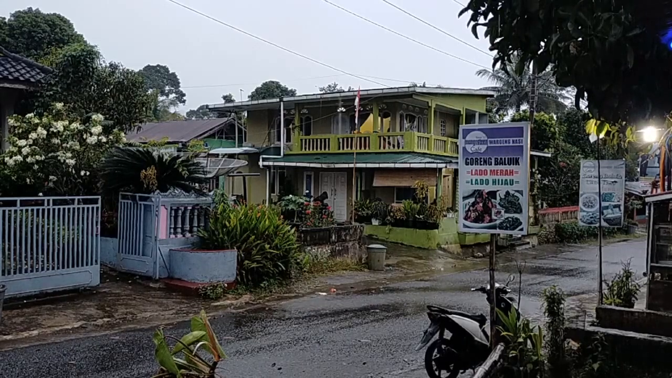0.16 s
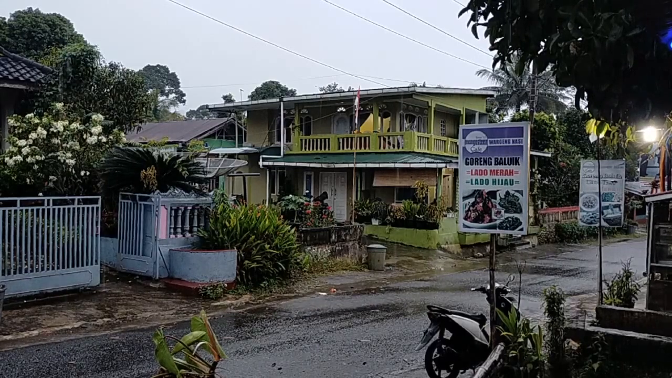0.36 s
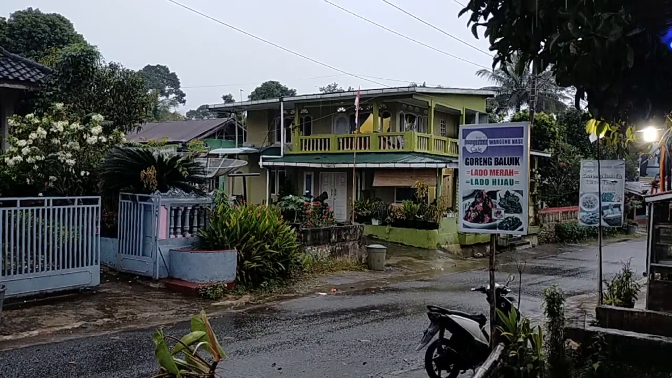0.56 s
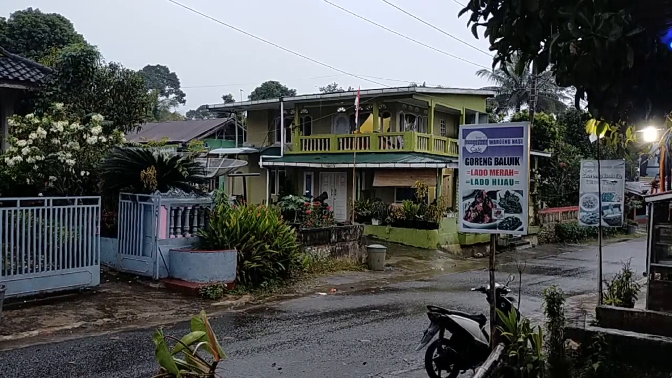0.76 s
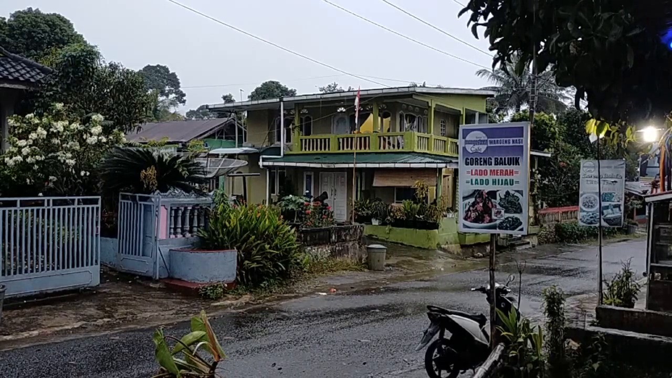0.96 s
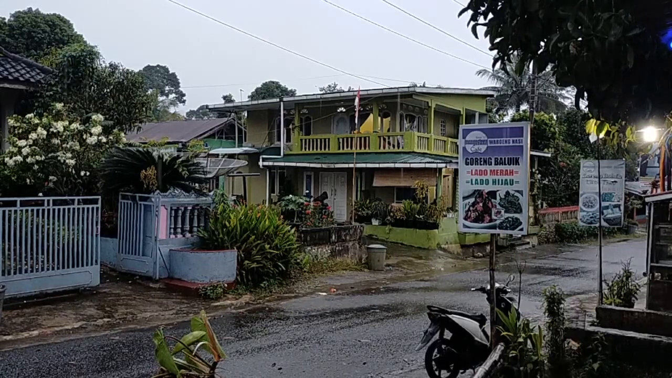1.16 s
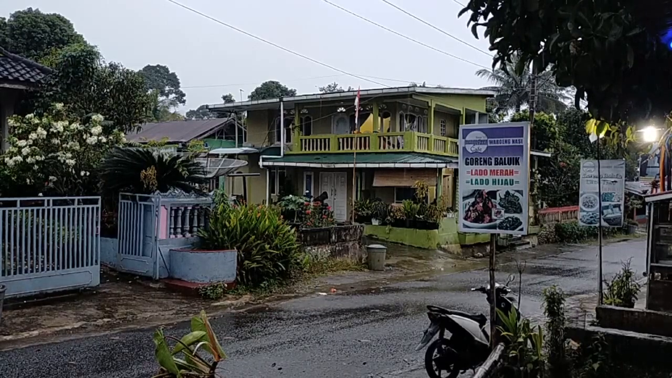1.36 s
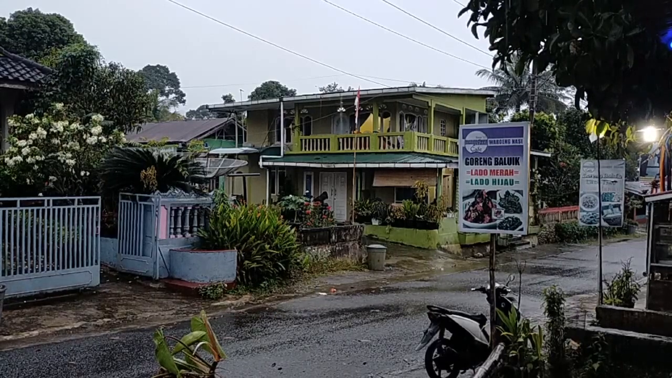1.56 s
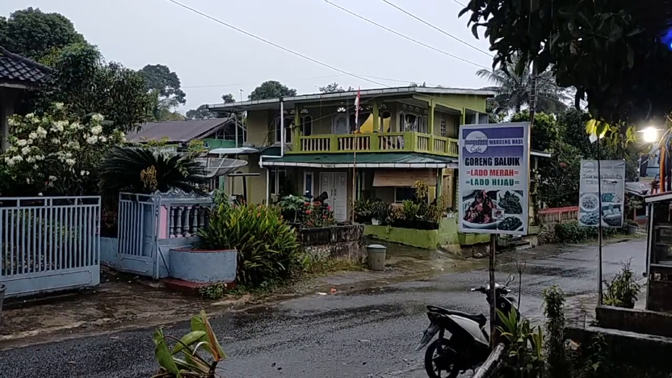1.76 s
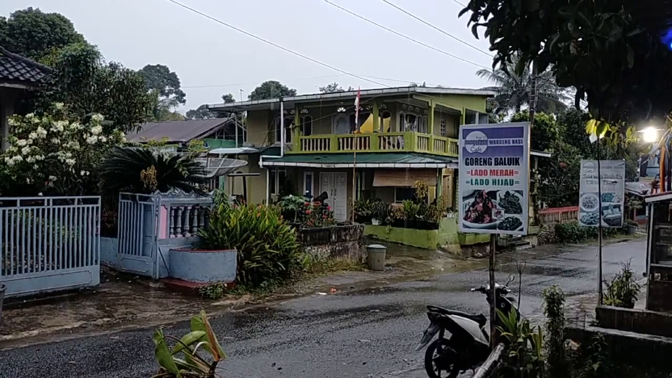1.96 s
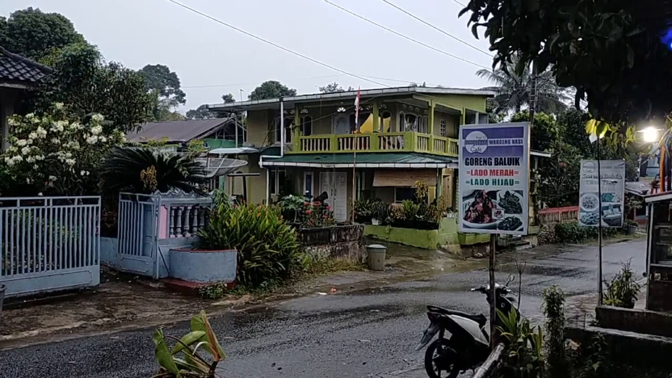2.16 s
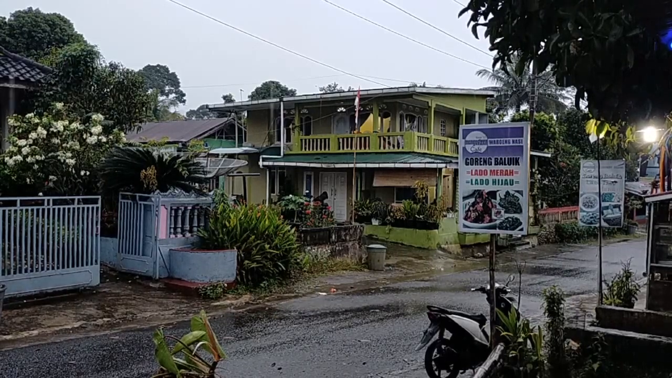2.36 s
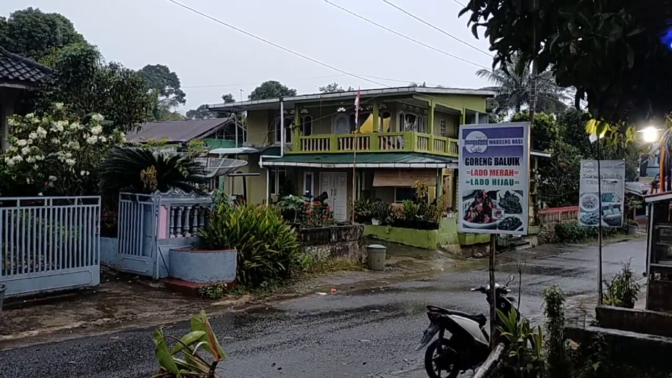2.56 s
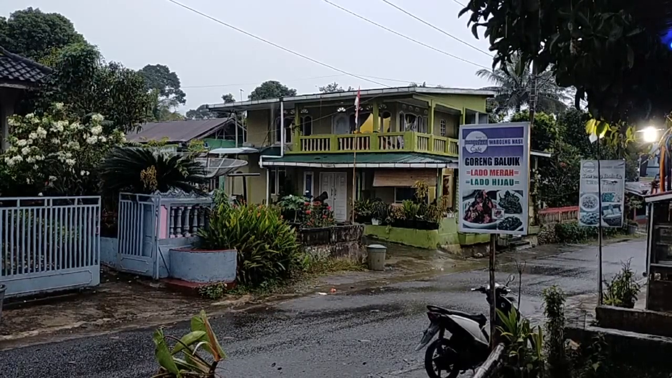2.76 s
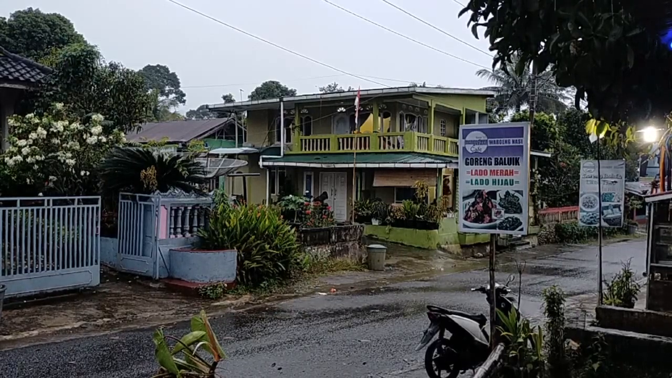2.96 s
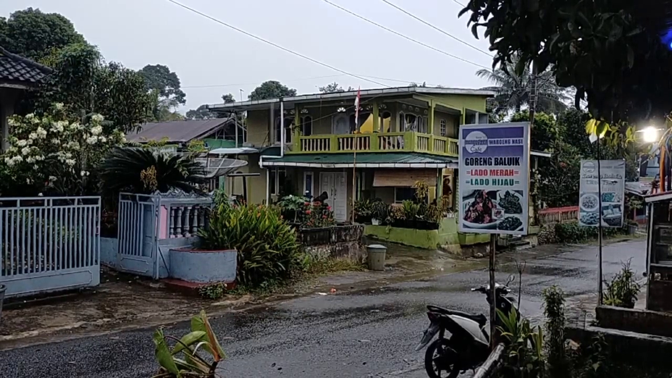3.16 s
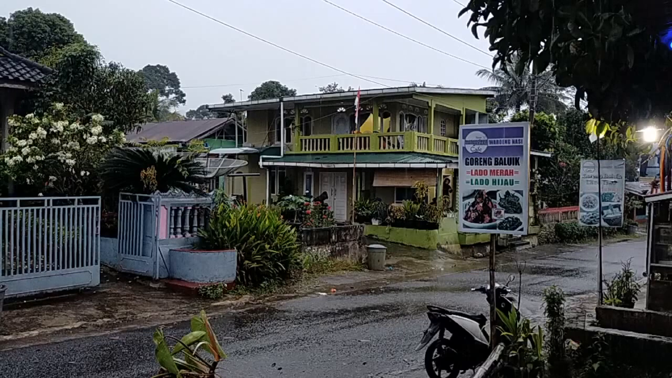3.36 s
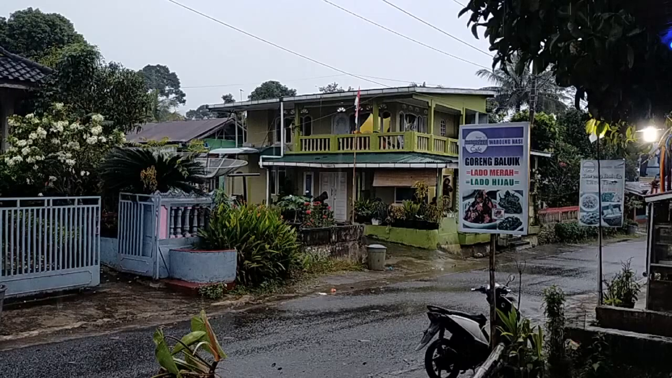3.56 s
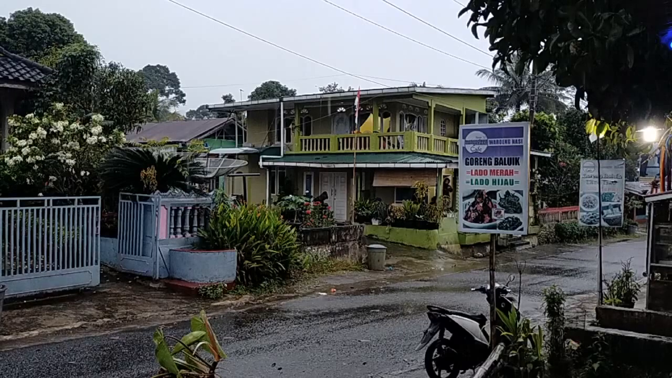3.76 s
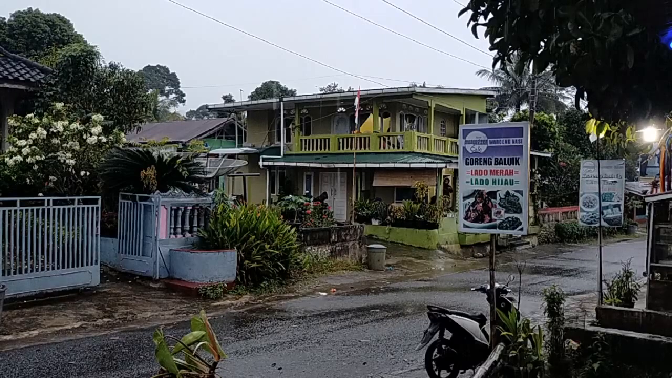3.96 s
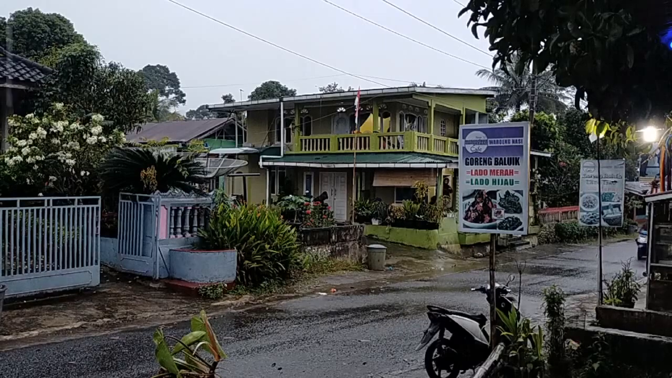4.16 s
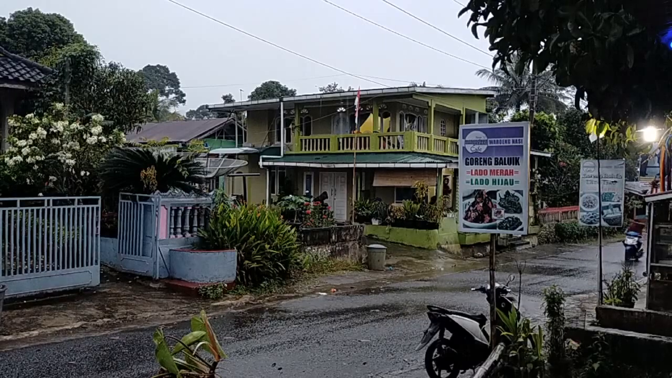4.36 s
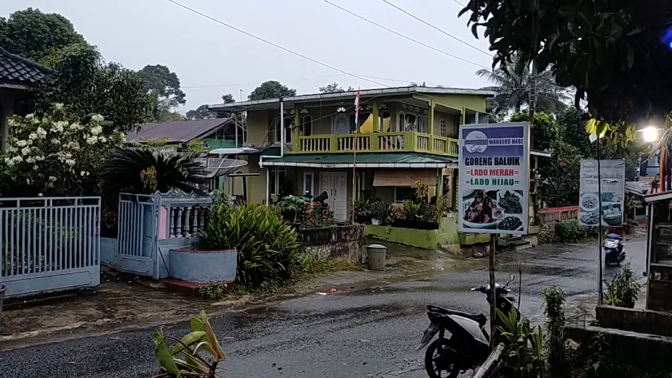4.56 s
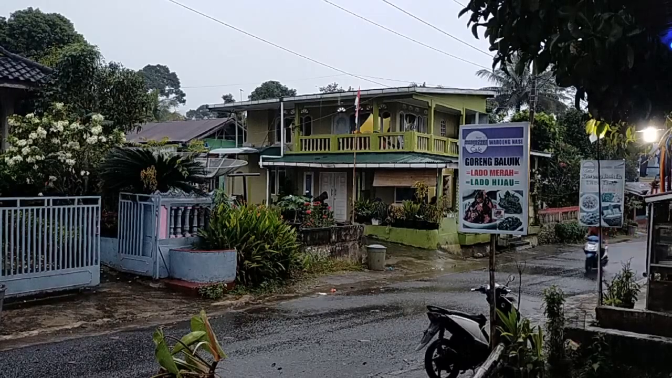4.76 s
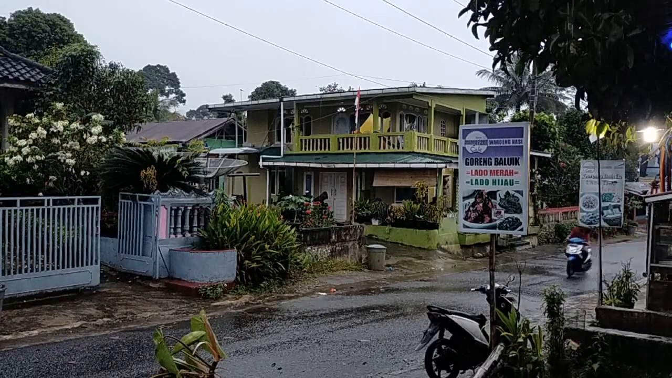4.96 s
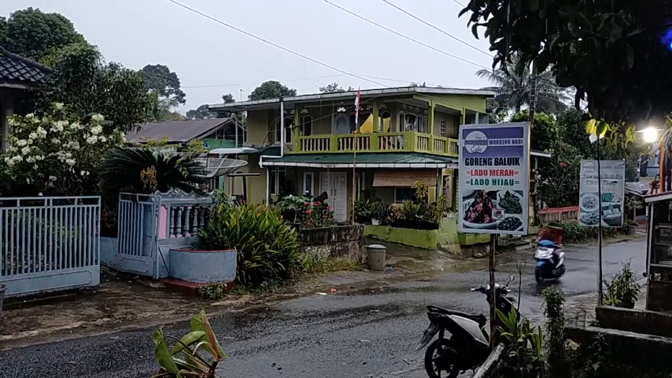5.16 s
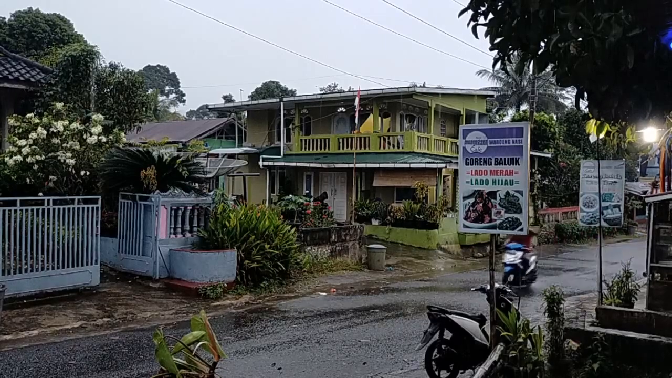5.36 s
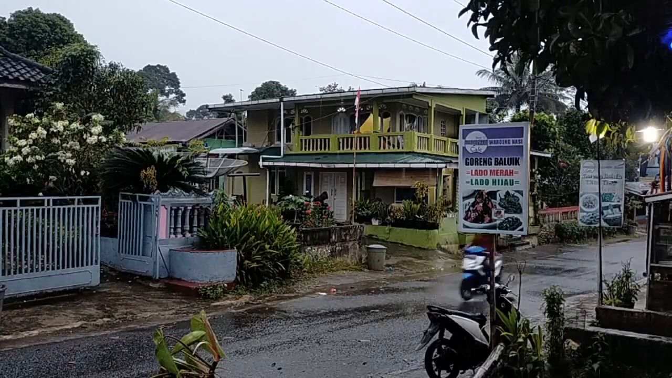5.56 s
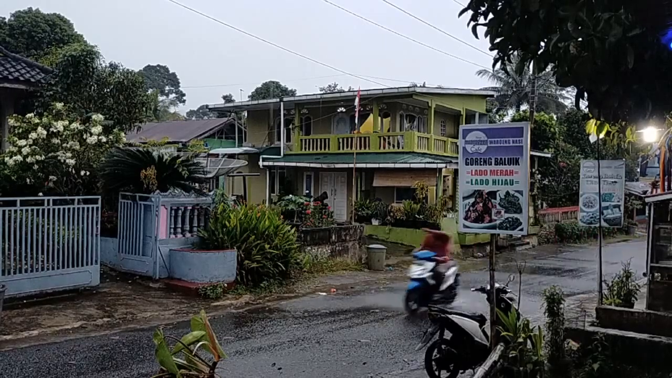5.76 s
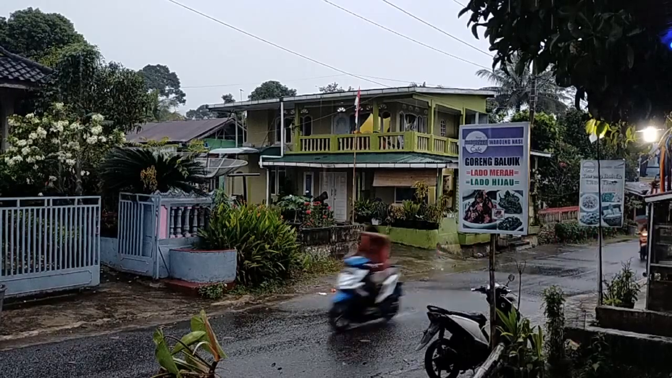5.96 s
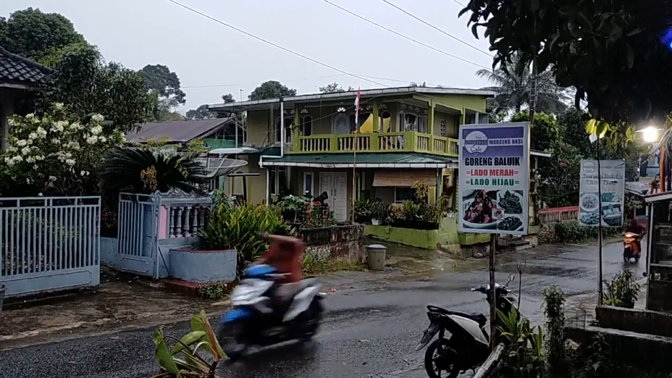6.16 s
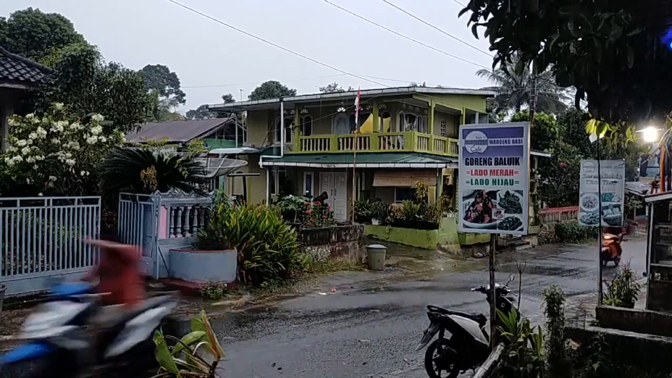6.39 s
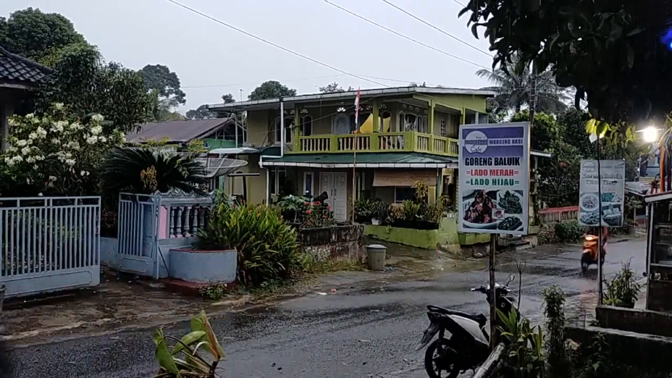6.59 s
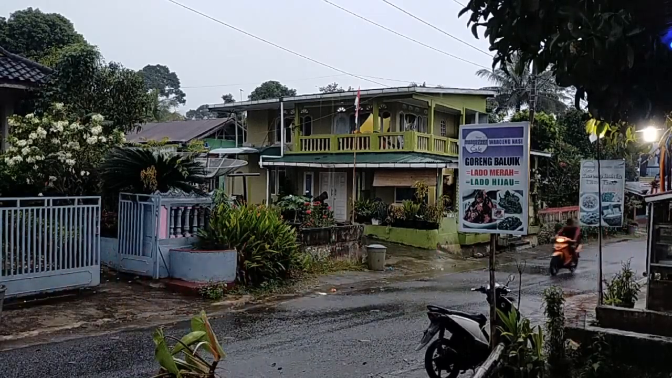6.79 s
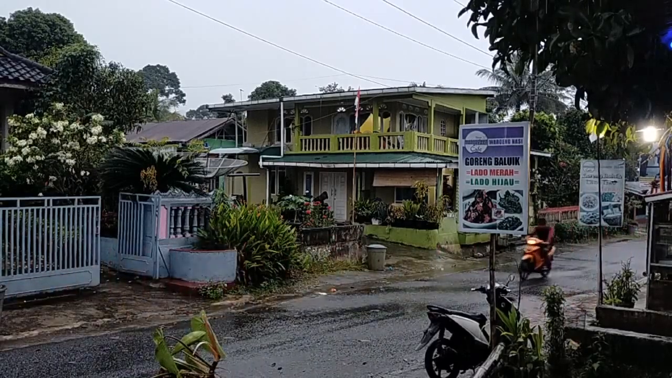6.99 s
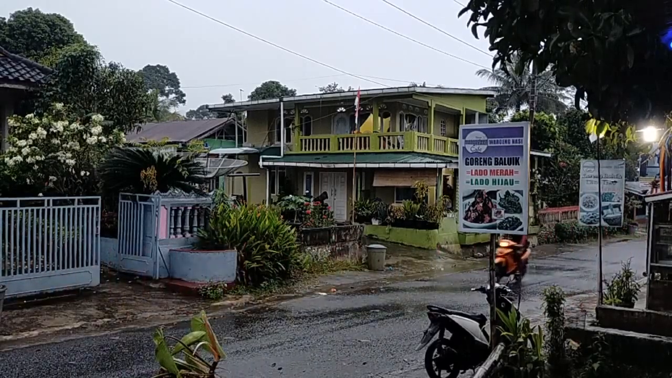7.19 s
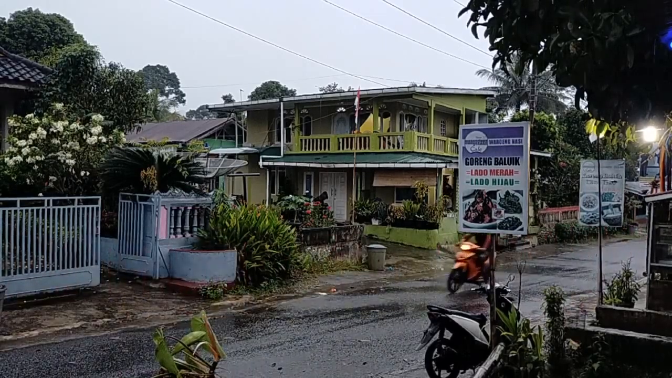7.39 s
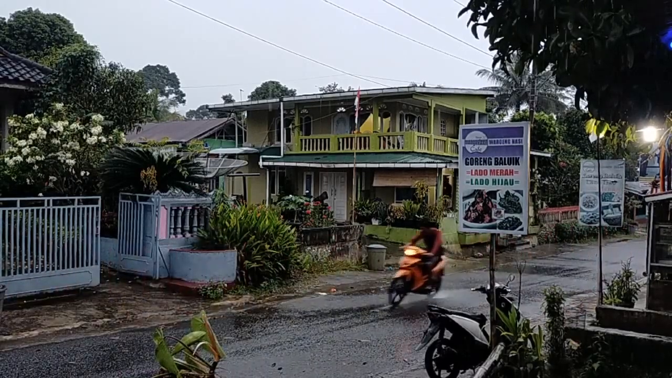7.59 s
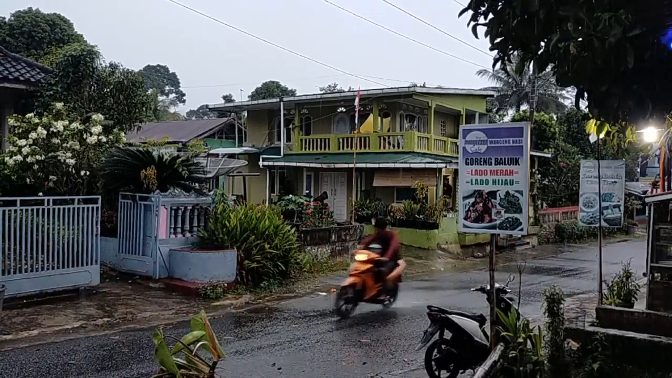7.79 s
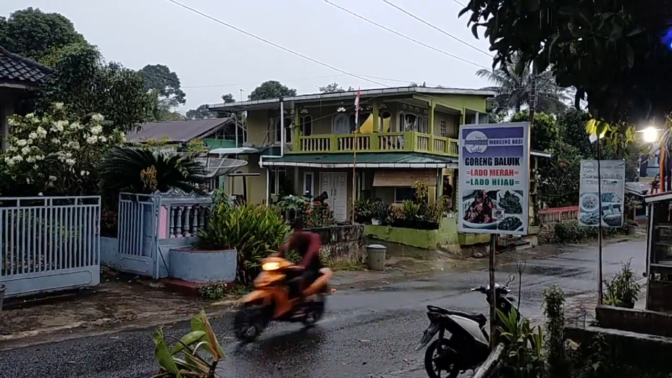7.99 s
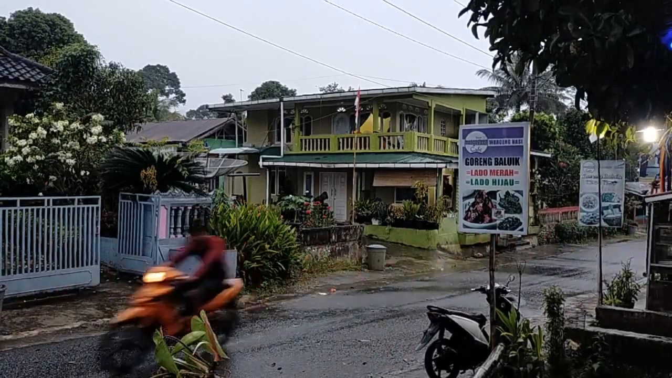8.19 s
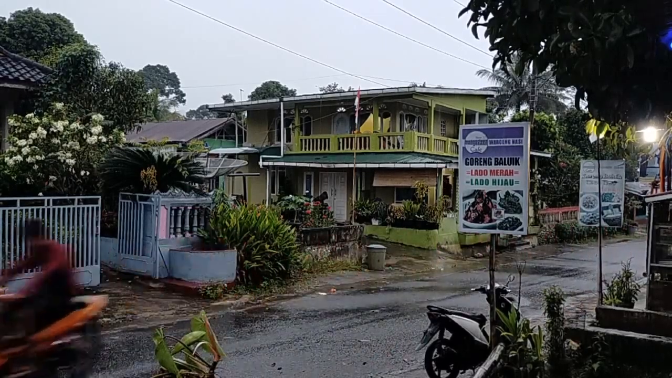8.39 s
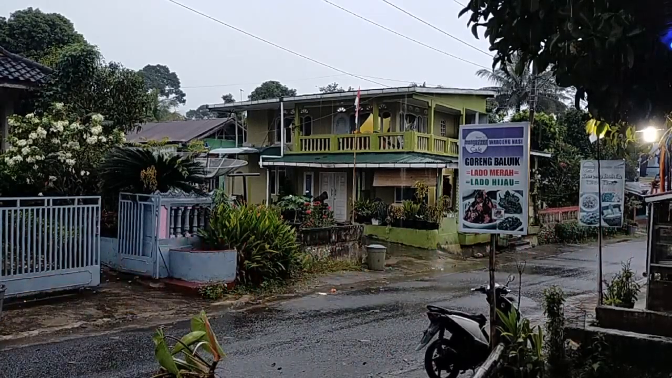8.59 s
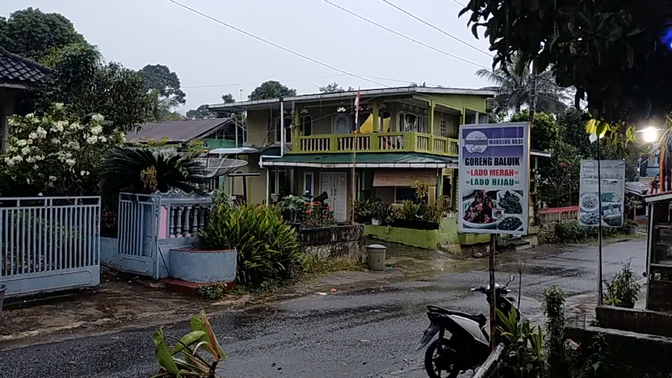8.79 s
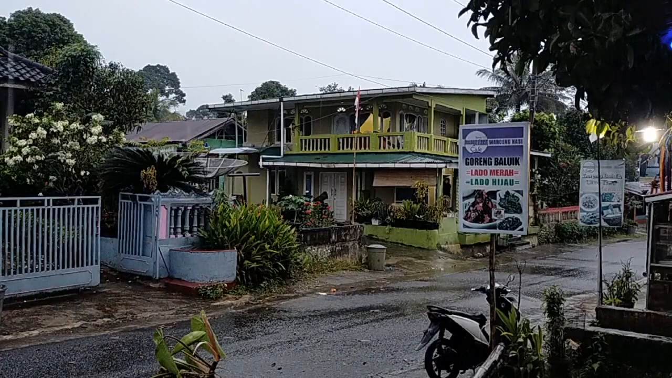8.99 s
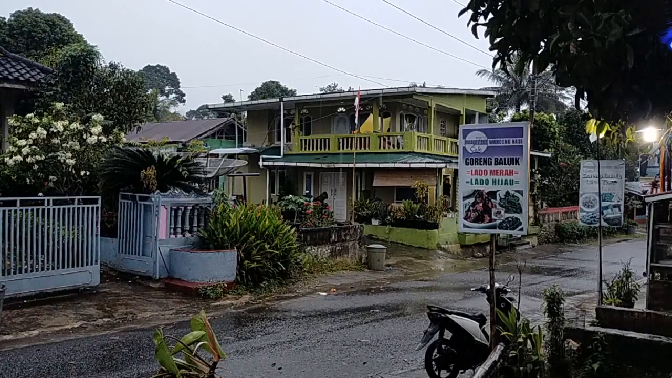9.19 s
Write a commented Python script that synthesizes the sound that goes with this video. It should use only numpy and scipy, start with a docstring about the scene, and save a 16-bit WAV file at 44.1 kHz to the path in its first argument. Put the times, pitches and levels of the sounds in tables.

```python
"""Two scooters in the rain

Light rain sizzles on a wet village street, large drips land nearby and a bird whistles once.
One scooter hums past; a second one drones nearer, blips its throttle and starts to pull away.
Engines are built from harmonics or pulses in step with the firings; rain, spray, hiss and roar are
shaped noise. Distance and direction set how loud each passing sound is."""
import sys
import numpy as np
from scipy import signal
from scipy.fft import rfft, irfft
from scipy.io import wavfile
from scipy.ndimage import uniform_filter1d

SR = 44100
rng = np.random.default_rng(int(sys.argv[2]) if len(sys.argv) > 2 else 0)


def wrap_up_sound(samples):
    """Save the sound to the file named by the first command line argument, as 16-bit audio."""
    columns = np.atleast_2d(samples).T
    # keep every value between -1 and 1, then stretch to whole-number steps
    tamed = np.clip(columns, -1, 1)
    steps = np.round(tamed * 32767).astype(np.int16)
    wavfile.write(sys.argv[1], SR, steps)


N = 407484  # samples, about 9.24 s
TIME = np.arange(N) / SR  # s
BINS = np.fft.rfftfreq(N, 1 / SR)  # Hz

# colour shared by all the bright hisses and ticks: pitch_hz [Hz], level_db [dB per Hz]
SIZZLE = [(1500, -54.5), (3000, -34), (3600, -25.5), (4400, -21), (5100, -18.5), (6000, -12), (6900, -4.5),
          (7350, 1), (7650, -0.5), (7850, -4), (8020, -17.5), (8270, -17), (8520, -38), (8800, -61)]
# firing rate of the second scooter's engine: time_s [s], rate_hz [firings per s]
SECOND_FIRING = [(0.0, 27.21), (4.3, 26.3), (6.3, 25.5), (7.0, 25.5), (7.35, 26.07), (7.62, 25.5),
                 (7.76, 24.78), (7.87, 31.69), (7.93, 30.83), (8.04, 32.48), (8.17, 38.1), (8.3, 32.12),
                 (8.5, 32.5), (8.75, 33.13), (9.0, 33.51), (9.24, 33.41)]
# the two rides past the microphone: closest_s [s], closest_m [m], speed [m/s]
FIRST_RIDE, SECOND_RIDE = (6.54, 3.9, 6.75), (8.87, 5.65, 5.3)


def amp(db):
    """Decibels to gain."""
    return 10 ** (np.asarray(db) / 20)


def unit(x):
    """Scales to an rms (average strength) of 1."""
    return x / np.sqrt(np.mean(x ** 2) + 1e-20)


def steady(x, size=5000):
    """Evens out the loudness by holding the running rms at 1; size is in samples."""
    power = uniform_filter1d(uniform_filter1d(x ** 2, size), size)
    return x / np.sqrt(abs(power) + 1e-12)


def read(points, hz):
    """Reads a table over pitch, with straight lines between points on a log-frequency axis."""
    f, value = np.transpose(points)
    return np.interp(np.log(hz + 1), np.log(f + 1), value)


def play(rows):
    """Turns each column of a timed table into a curve, sample by sample."""
    s, *columns = np.transpose(rows)
    return [np.interp(TIME, s, column) for column in columns]


def drift(hz):
    """A random wander with an rms of 1, up to about the given rate."""
    spectrum = rfft(rng.standard_normal(N))
    return unit(irfft(spectrum / (1 + (BINS / hz) ** 4), N))


def swell(centre, half_length, squareness=3.0):
    """A smooth rise to 1, a hold and a fall; times in s."""
    return np.exp(-abs((TIME - centre) / half_length) ** squareness)


def ease(s, length):
    """A smooth step from 0 to 1; times in s."""
    return (1 + np.tanh((TIME - s) / length)) / 2


def colour(x, spectrum):
    """Shapes a sound to a spectrum with a filter that never rings ahead (minimum phase)."""
    log_gain = np.log(amp(read(spectrum, abs(np.fft.fftfreq(8192, 1 / SR)))))
    taps = np.fft.ifft(np.exp(np.conj(signal.hilbert(log_gain)))).real
    return signal.oaconvolve(x, taps[:len(taps) // 2])[:N]


def resonance(x, hz, width_hz):
    """A steep, fixed resonance that keeps pitches near hz; the result has an rms of 1."""
    ring = 1 / (1 + 1j * (BINS - hz) / width_hz) ** 3
    return unit(irfft(rfft(x) * ring, N))


def droplets(per_s, spread_db):
    """Random tiny impacts, a few much larger than the rest."""
    size = amp(spread_db * np.minimum(rng.exponential(1, N), 5))
    lands = rng.random(N) < per_s / SR
    return unit(size * rng.choice([-1, 1], N) * lands)


def street(x, count=3):
    """Echoes from house fronts: random reflections that die away, and change as the source moves past."""
    # time for an echo to fall by 60 dB: pitch_hz [Hz], decay_s [s]
    echo_decay = [(100, 0.058), (300, 0.46), (1500, 0.47), (8000, 0.13)]
    out = np.zeros(N)
    for k in range(count):
        reflections = rng.standard_normal(SR // 2) * (rng.random(SR // 2) < 2000 / SR)
        hz, t, z = signal.stft(reflections, SR, nperseg=256)
        fall = amp(-60 * t / read(echo_decay, hz)[:, None])
        tail = signal.istft(z * fall, SR)[1]
        # the echo patterns fade into one another in turn
        window = np.cos(np.pi * (0.5975 * TIME + k / count)) * np.sqrt(2 / count)
        out += signal.oaconvolve(x * window, tail / np.linalg.norm(tail))[:N]
    return out


def position(ride):
    """Doublings of the closest distance, and bearing: towards -1 coming, towards +1 going."""
    closest_s, closest_m, speed = ride
    along = speed * (TIME - closest_s)
    distance = np.hypot(along, closest_m)
    return np.log2(distance / closest_m), along / distance


def carried(ride, closest_db, falloff_db, rear_db):
    """Gain of a passing sound: it loses falloff_db per doubling of distance and gains rear_db from behind."""
    doublings, bearing = position(ride)
    return amp(closest_db - falloff_db * doublings + rear_db * bearing)


def load_db():
    """How hard the second engine works, in dB, as the throttle opens and closes."""
    # surges and dips in load: centre_s [s], half_length_s [s], load_db [dB]
    surges = [(7.352, 0.58, 6.5), (7.858, 0.042, 6.5), (7.94, 0.051, -1), (8.022, 0.018, 7.5),
              (8.196, 0.1, 7.5), (8.501, 0.044, 5.5), (8.722, 0.028, 3), (8.898, 0.086, 2),
              (9.05, 0.056, 0), (9.147, 0.038, -5), (9.224, 0.028, 4)]
    return sum(db * swell(s, half) for s, half, db in surges)


def far_engine(firing, gain, tilt_db, orders, swells, fade_db, jitter):
    """A single cylinder from afar: a few harmonics of its firing rate fade in and out among the houses."""
    cycles = np.cumsum(play(firing)[0] * (1 + jitter * drift(6.5))) / SR
    hum = np.zeros(N)
    for k, db in orders:
        level = amp(db + tilt_db * np.log2(max(k, 2)) + fade_db * drift(3.0))
        hum += level * np.cos(2 * np.pi * (round(k) * cycles + rng.random()))
    hum = gain * steady(hum)
    for s, half, k, db in swells:
        level = np.sqrt(2) * amp(db + 1.2 * drift(12)) * swell(s, half)
        hum += level * np.cos(2 * np.pi * (round(k) * cycles + rng.random()))
    return hum


def bursts(decay_cycles):
    """A short burst of noise at every firing of the second engine; decay in firing cycles."""
    cycles = np.cumsum(play(SECOND_FIRING)[0]) / SR
    return rng.standard_normal(N) * np.exp(-(cycles % 1) / decay_cycles)


def rain():
    """Countless drops sizzle on leaves and asphalt over the low wash of the street."""
    # low wash of the wet street: pitch_hz [Hz], level_db [dB per Hz]
    wash_spectrum = [(15, -39.5), (30, -17), (60, -6), (105, -6), (160, -0.5), (215, -4.5), (320, 0),
                     (480, -2), (660, -1.5), (1000, -6.5), (1500, -11.5), (2000, -19.5), (2800, -26),
                     (4000, -56)]
    drops = droplets(per_s=1500, spread_db=1.5)
    sizzle = unit(colour(rng.standard_normal(N) + 0.47 * drops, SIZZLE))
    sizzle *= amp(-33 + 0.71 * drift(20.0) + 1.0 * drift(42))
    wash = unit(colour(rng.standard_normal(N), wash_spectrum))
    wash *= amp(-40 + 0.7 * drift(5) + 0.68 * drift(38))
    return sizzle + wash


def street_swells():
    """Soft swells in the rumble of the street: noise through one broad resonance."""
    # centre_s [s], half_length_s [s], level_db [dB]
    rumbles = [(.05, 0.16, -42.5), (1.15, 0.15, -41.5), (2.4, 0.25, -44.5), (3.4, 0.33, -45.5)]
    rumble = resonance(rng.standard_normal(N), hz=660, width_hz=300)
    return rumble * sum(amp(db) * swell(s, half) for s, half, db in rumbles)


def drips_and_ticks(tail_s=0.03, tail_db=-14, width_hz=2600):
    """Drips, and late on sharp ticks from the second scooter's firings: a bright onset and a weaker tail."""
    # drips close by; the last two rows are hiss ticks of firings: start_s [s], peak_db [dB], pitch_hz [Hz]
    ticks = [(.2614, -20.5, 4800), (.398, -10, 6800), (.7597, -22, 7500), (0.997, -20, 7500),
             (1.1738, -17.5, 6780), (1.5237, -18.5, 6200), (2.362, -15, 7000), (2.712, -22, 7200),
             (2.85, -18, 6500), (5.5924, -13, 6850), (6.55, -17, 7230), (7.7643, -8, 7300),
             (7.7959, -10, 7300), (8.366, -11.5, 7100), (8.615, -12, 7400)]
    out, t = np.zeros(N + SR), np.arange(SR // 8) / SR
    bin_hz = np.fft.rfftfreq(len(t), 1 / SR)
    onset = np.exp(-t / 0.0035)
    tail = amp(tail_db) * np.exp(-t / tail_s)
    for s, db, hz in ticks:
        burst = rng.standard_normal(len(t)) * (onset + tail)
        spectrum = rfft(colour(burst, SIZZLE)[:len(t)])
        tick = irfft(spectrum / (1 + 1j * (bin_hz - hz) / width_hz) ** 3, len(t))
        out[round(s * SR):][:len(t)] += amp(db) * tick / abs(tick).max()
    return out[:N]


def bird(echo=0.18, waver=0.0046):
    """One falling whistle: a pure tone with a slightly wavering pitch, faintly echoed by the houses."""
    # time_s [s], pitch_hz [Hz], level_db [dB]
    whistle = [(5.39, 1727, -61), (5.54, 1660, -55), (5.59, 1581, -46.5), (5.635, 1480, -43.5),
               (5.7, 1474, -40.5), (5.78, 1452, -41.5), (5.83, 1400, -57)]
    hz, db = play(whistle)
    sounding = (TIME > whistle[0][0]) & (TIME < whistle[-1][0])
    cycles = np.cumsum(hz * (1 + waver * drift(60))) / SR
    tone = np.sqrt(2) * sounding * amp(db) * np.sin(2 * np.pi * cycles)
    return tone + echo * street(tone)


def first_scooter(bright_db=1.8, dulling_db=3.5):
    """A well-silenced engine hums past; distance weakens its upper harmonics."""
    # firing rate: time_s [s], rate_hz [firings per s]
    first_firing = [(3.3, 36), (4.2, 41), (4.8, 46.4), (5.3, 43), (6, 41.8), (6.5, 39.2), (7.1, 37.3),
                    (7.7, 41)]
    # balance of the harmonics before the tilt: multiple [of the firing rate], level_db [dB]
    hum_orders = [(1, -2.5), (2, -2), (3, -5.5), (4, -4), (5, 0.5), (6, 1), (7, 3), (8, -4), (9, -9.5),
                  (10, -4.5), (11, -15.5), (13, -7), (14, -8)]
    # single harmonics that swell briefly: centre_s [s], half_length_s [s], multiple, level_db [dB]
    hum_swells = [(4.41, .45, 2, -48), (5.5, 0.53, 7, -46.5), (6.85, 0.31, 2, -42.5)]
    tilt_db = bright_db - dulling_db * position(FIRST_RIDE)[0]  # per octave
    gain = carried(FIRST_RIDE, closest_db=-36, falloff_db=8.6, rear_db=-0.85)
    return far_engine(first_firing, gain, tilt_db, hum_orders, hum_swells, fade_db=1.5, jitter=0.0038)


def spray():
    """Tyres throw hissing spray from the wet street; the hiss also swells briefly now and then."""
    # brief swells of hiss, mostly as the second scooter passes: centre_s [s], half_length_s [s], level_db [dB]
    hiss_swells = [(5.023, 0.084, -29), (7.612, 0.079, -26.5), (7.823, 0.14, -24), (8.02, 0.032, -23.5),
                   (8.256, 0.043, -30), (8.502, 0.055, -23.5), (8.77, 0.088, -25.5), (8.98, 0.14, -27.5)]
    # spray comes into earshot, then a corner that had screened it by 8 dB opens up
    in_view = ease(4.52, 0.07) * amp(8 * (ease(4.94, 0.04) - 1))
    first_spray = carried(FIRST_RIDE, closest_db=-25, falloff_db=4.6, rear_db=-2.2)
    second_spray = carried(SECOND_RIDE, closest_db=-28, falloff_db=5.6, rear_db=-0.83)
    thrown = in_view * np.hypot(first_spray, second_spray)
    swelling = sum(amp(db) * swell(s, half) for s, half, db in hiss_swells)
    drops = droplets(per_s=2500, spread_db=2.0)
    mist = unit(colour(rng.standard_normal(N) + 0.49 * drops, SIZZLE))
    return mist * np.hypot(thrown, swelling) * amp(1.0 * drift(99))


def tyre_and_intake_roar():
    """Tyres of the first scooter roar; the second's roar is its engine's intake, rising with load."""
    # colour of both roars: pitch_hz [Hz], level_db [dB per Hz]
    roar_spectrum = [(15, -30.5), (40, -10.5), (80, -10.5), (160, -8), (270, 4.5), (420, 3.5), (600, -1.5),
                     (800, 1), (1150, -7), (1600, -14.5), (2100, -17), (3000, -24.5), (4500, -49)]
    tyre_gain = carried(FIRST_RIDE, closest_db=-34.5, falloff_db=8.4, rear_db=0.83)
    intake_gain = carried(SECOND_RIDE, closest_db=-39, falloff_db=7.4, rear_db=-1)
    gain = np.hypot(tyre_gain, intake_gain * amp(0.96 * load_db()))
    roar = unit(colour(rng.standard_normal(N), roar_spectrum))
    return roar * gain * amp(0.97 * drift(45))


def second_approach(bright_db=3.5, dulling_db=3.5):
    """The second scooter drones up the street; distance weakens its upper harmonics."""
    # balance of the harmonics before the tilt: multiple [of the firing rate], level_db [dB]
    drone_orders = [(3, -20.5), (4, -8.5), (5, -4.5), (6, -10), (8, -13), (9, -10), (10, 3), (11, -7),
                    (13, -7), (15, -8), (16, -0.5), (17, -6), (20, -11)]
    # single harmonics that swell briefly: centre_s [s], half_length_s [s], multiple, level_db [dB]
    drone_swells = [(2.3, .13, 4, -48), (4.5, 0.56, 4, -53), (6.4, 0.099, 5, -42.5), (7.558, 0.21, 5, -32),
                    (7.6, .27, 10, -31.5), (7.542, 0.17, 20, -39.5), (7.935, .022, 4, -29)]
    tilt_db = bright_db - dulling_db * position(SECOND_RIDE)[0]  # per octave
    gain = carried(SECOND_RIDE, closest_db=-39, falloff_db=5.64, rear_db=-3.5)
    return far_engine(SECOND_FIRING, gain, tilt_db, drone_orders, drone_swells, fade_db=4.0, jitter=0.004)


def valve_rattle():
    """A short metallic tick with every firing: a noise burst through a high resonance."""
    ticks = resonance(bursts(decay_cycles=0.044), hz=3100, width_hz=900)
    return ticks * carried(SECOND_RIDE, closest_db=-58.5, falloff_db=16, rear_db=11)


def silencer_knock():
    """Each firing knocks in the silencer's shell, a resonance heard mostly from behind."""
    knocks = steady(resonance(bursts(decay_cycles=0.11), hz=1380, width_hz=480))
    gain = carried(SECOND_RIDE, closest_db=-43.5, falloff_db=4, rear_db=12.5)
    return knocks * gain * amp(0.22 * load_db())


def pulsing_hiss(exhaust, lag_s=0.0012):
    """A bright hiss that pulses just after each firing, following the exhaust's strength."""
    strength = abs(uniform_filter1d(steady(exhaust) ** 2, size=80))
    delayed = np.interp(TIME - lag_s, TIME, strength)
    hiss = unit(colour(rng.standard_normal(N) * np.sqrt(delayed), SIZZLE))
    gain = carried(SECOND_RIDE, closest_db=-25.5, falloff_db=8.5, rear_db=2)
    return hiss * gain * amp(0.71 * load_db())


def second_exhaust(intake=0.15, intake_at=0.4, uneven_db=0.5, puff=0.036, puff_cycles=0.27,
                   rebound=0.26, pipe_s=0.0011):
    """One sharp pulse a firing, a weaker suck at the intake stroke and a puff of gas noise, with echoes."""
    # colour the silencer gives: pitch_hz [Hz], level_db [dB per Hz]
    silencer = [(20, -26), (45, -4), (68, 8), (100, 10.5), (133, 1), (170, 6), (215, 0), (290, 2.5),
                (360, -6), (520, -7.5), (750, -12.5), (1050, -11.5), (1450, -15.5), (1850, -22.5),
                (2400, -39), (5000, -67)]
    cycles = np.cumsum(play(SECOND_FIRING)[0]) / SR
    firings = np.diff(np.floor(cycles), prepend=0)
    sucks = np.diff(np.floor(cycles - intake_at), prepend=-1)
    pulses = (firings - intake * sucks) * amp(uneven_db * rng.standard_normal(N))
    gas = puff * rng.standard_normal(N) * np.exp(-(cycles % 1) / puff_cycles)
    # the open pipe end sends each pulse back inverted
    reflected = np.interp(TIME - pipe_s, TIME, pulses)
    pipe = colour(pulses - rebound * reflected + gas, silencer)
    # direct sound compared with its echoes
    direct = carried(SECOND_RIDE, closest_db=4.5, falloff_db=6, rear_db=5.5)
    return (direct * steady(pipe) + steady(street(pipe))) / np.hypot(direct, 1)


def second_scooter(exhaust, boom_hz=190, rasp_hz=950):
    """Boom, bark and rasp of the pipe grow with load, and as the scooter nears and shows its tail."""
    low = 1 / (1 + (BINS / boom_hz) ** 8)
    high = 1 - 1 / (1 + (BINS / rasp_hz) ** 8)
    boom = carried(SECOND_RIDE, closest_db=-34, falloff_db=5.5, rear_db=10)
    bark = carried(SECOND_RIDE, closest_db=-29, falloff_db=7.1, rear_db=2.6)
    rasp = carried(SECOND_RIDE, closest_db=-48, falloff_db=8.1, rear_db=8.2)
    # band, gain, share of the engine load
    bands = ((low, boom, 0.6), (1 - low - high, bark, 1), (high, rasp, 1.0))
    spectrum, load = rfft(exhaust), load_db()
    out = np.zeros(N)
    for band, gain, load_share in bands:
        out += gain * amp(load_share * load) * steady(irfft(spectrum * band, N))
    return out


def scene():
    """All sources at one microphone."""
    background = rain() + street_swells() + drips_and_ticks() + bird()
    passing = first_scooter() + spray() + tyre_and_intake_roar()
    exhaust = second_exhaust()
    second = second_approach() + valve_rattle() + silencer_knock() + pulsing_hiss(exhaust)
    second += second_scooter(exhaust)
    return (background + passing + second)[None]


def record(dry, edge_hz=8750):
    """The recorder's steep band limit: almost nothing passes above the edge."""
    band_limit = signal.firwin(511, edge_hz, window=("kaiser", 9), fs=SR)
    return signal.oaconvolve(dry, band_limit[None], "same")


dry = scene()
out = record(dry)
wrap_up_sound(out)
```